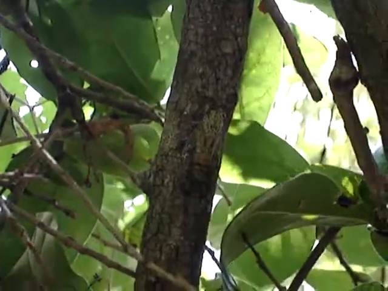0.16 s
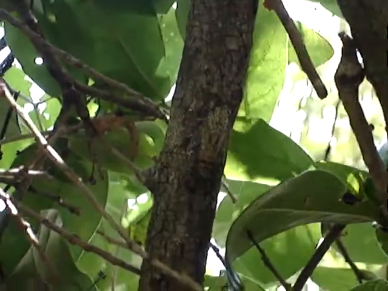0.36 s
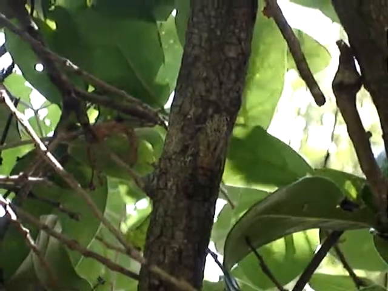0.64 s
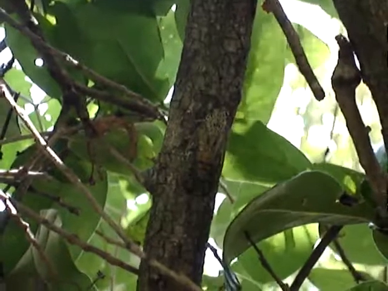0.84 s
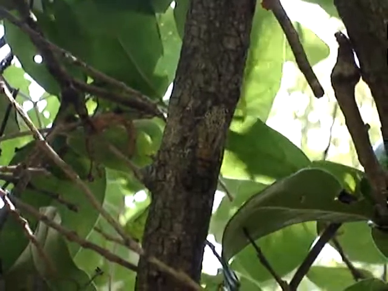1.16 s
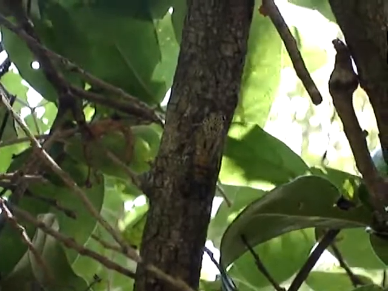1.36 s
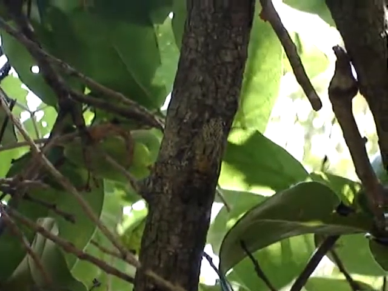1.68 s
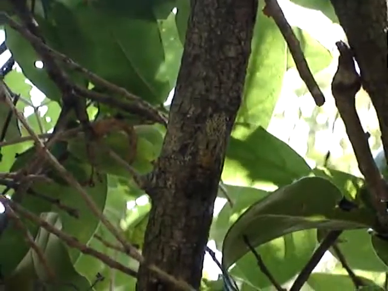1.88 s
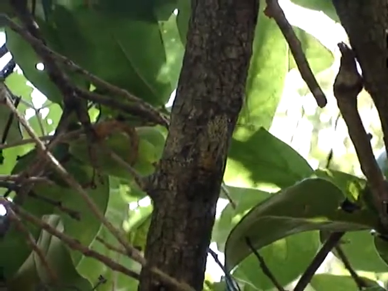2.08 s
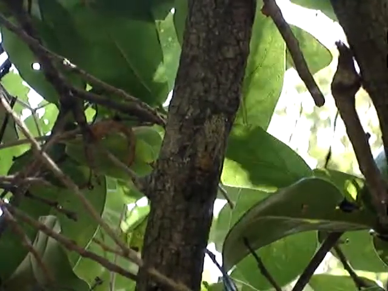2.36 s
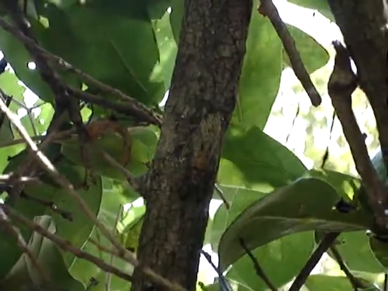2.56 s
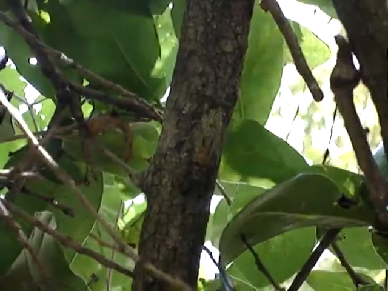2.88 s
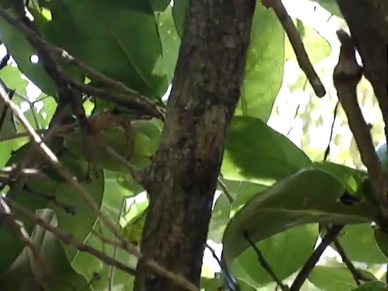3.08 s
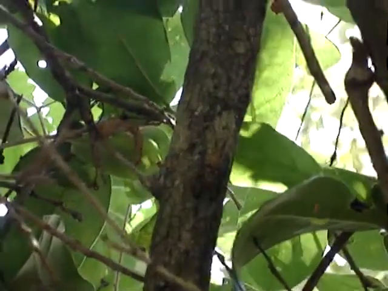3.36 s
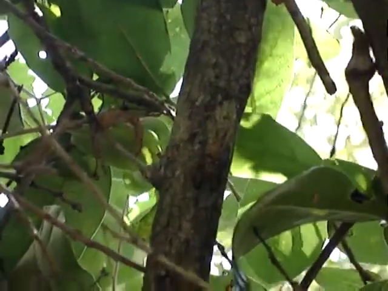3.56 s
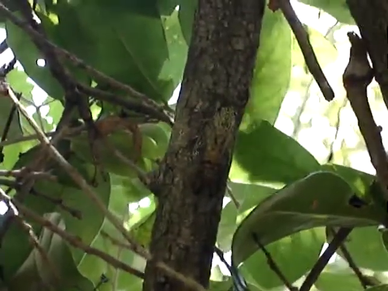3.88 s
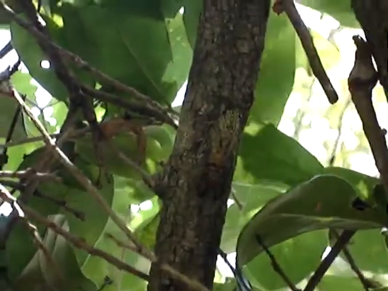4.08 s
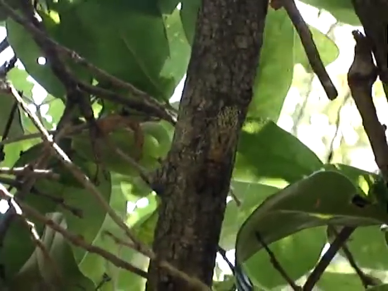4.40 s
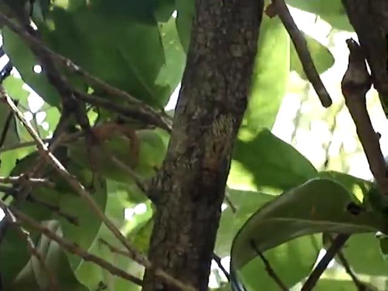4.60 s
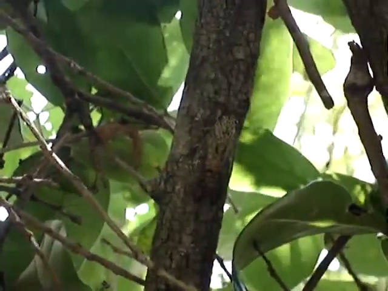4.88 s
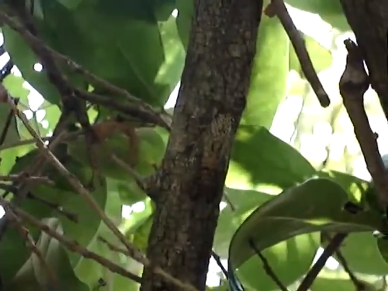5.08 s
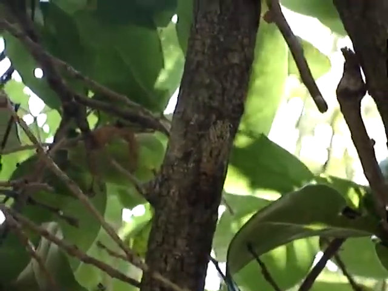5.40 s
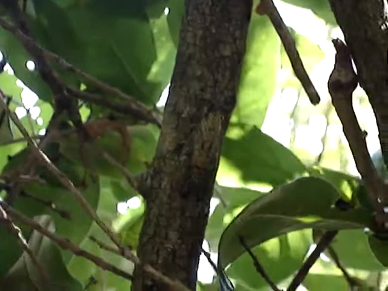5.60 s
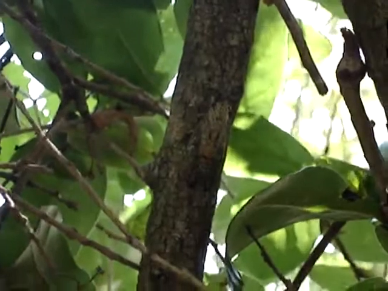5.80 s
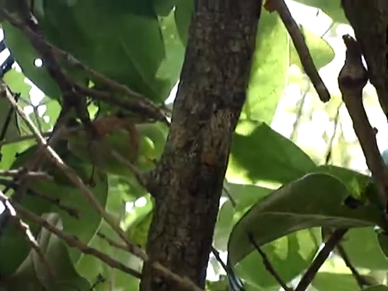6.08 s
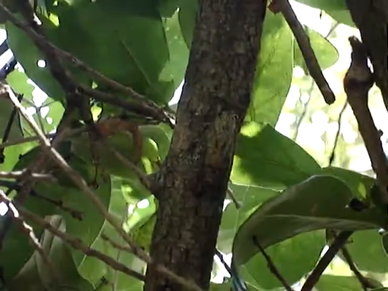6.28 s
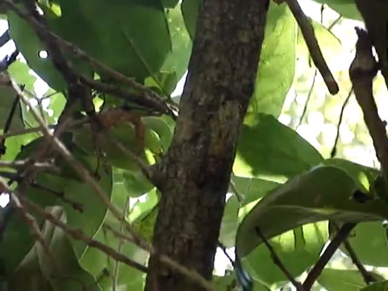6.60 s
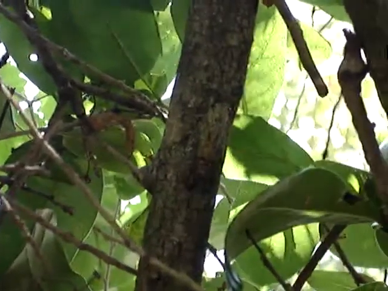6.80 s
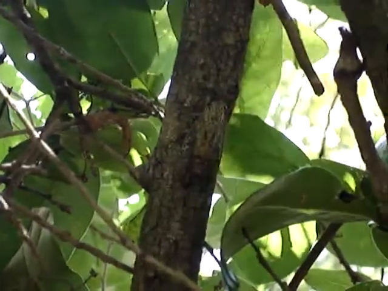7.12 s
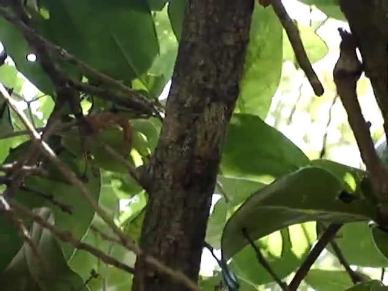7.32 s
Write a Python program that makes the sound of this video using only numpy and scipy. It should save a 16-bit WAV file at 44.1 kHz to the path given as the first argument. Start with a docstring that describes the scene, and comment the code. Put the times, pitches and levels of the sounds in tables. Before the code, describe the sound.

Harsh high insect buzzing surges and cuts off about twice a second, stutters, rests, and returns in a quick flurry above distant road noise.

```python
"""A cicada sings close by: its buzz runs up into shrill peaks, breaks off and restarts, stutters in bouts midway,
then rests for over a second before a last flurry. A fainter cicada rasp swells and fades behind the main buzz,
and a vehicle passes far away with a sinking drone over tyre roar, low thuds and faint air.
Buzz and rasp are trains of tymbal clicks ringing through body resonances; the road is shaped noise and two sines.
One microphone feeds both channels; its gain control ducks whatever passes a threshold."""
import sys
import numpy as np
from scipy import signal
from scipy.io import wavfile
from scipy.ndimage import uniform_filter1d

SR = 44100
rng = np.random.default_rng(int(sys.argv[2]) if len(sys.argv) > 2 else 0)


def transcribe(u):
    """Save the signal u as a 16-bit wav file named by the first command-line argument.

    u: samples, shape (n,) or (channels, n), limited to [-1, 1]; the rate is SR.
    q: integer samples, one column per channel.
    """
    v = np.clip(np.atleast_2d(u).T, -1, 1)
    q = np.round(v * 32767).astype(np.int16)
    wavfile.write(sys.argv[1], SR, q)


N = 328545
TIME = np.arange(N) / SR  # seconds

# Idling buzz of the near cicada between peaks.
# Each row: time in seconds, rate in clicks per second, abdomen level in dB.
IDLE_BUZZ = [(0, 195, -28), (1.6, 188, -26), (3.4, 184, -24.5), (4.57, 172, -22.5), (4.64, 140, -21.5),
             (5.1, 114, -21.5), (5.25, 135, -22), (6.56, 235, -19.5), (7.45, 245, -22.5)]
# Shrill peaks of the near cicada. Each row: time of full effort in seconds, hold in seconds, run-up in seconds,
# top rate in clicks per second before the arch, abdomen level in dB, whether it breaks off afterwards.
SHRILL_PEAKS = [(.288, .125, 0.087, 336, -17, True), (.802, .123, .085, 338, -18, True),
                (1.295, .140, .085, 336, -17, True), (1.797, .122, .06, 339, -15, True),
                (2.305, .128, 0.083, 339, -15, True), (3.015, .126, 0.091, 341, -16, True),
                (3.700, .133, 0.097, 341, -14, True), (6.635, .080, .08, 353, -11.5, False),
                (6.841, .022, 0.0071, 338, -14.5, False), (6.967, .030, 0.0076, 328, -16.5, False),
                (7.105, .115, 0.065, 338, -14.5, False), (7.337, .028, 0.01, 332, -18, False)]
# Stalls of the near cicada. Each row: start in seconds, end in seconds.
SONG_STALLS = [(1.73, 1.741), (2.905, 2.92), (3.545, 3.575), (4.456, 4.475), (4.526, 4.574), (5.175, 5.201),
               (5.248, 6.56), (6.824, 6.84), (6.957, 6.968), (7.326, 7.339)]
# Bouts of stutter in its click rate. Each row: start in seconds, length in seconds, depth as a share of the rate.
STUTTER_BOUTS = [(2.699, .08, 0.13), (3.353, 0.065, .13), (4.16, .36, .2), (5.101, .15, .11)]
# Resonances of its abdomen, slack and stretched taut.
# Each row: pitch in Hz, width in Hz, level in dB relative to the other rows.
SLACK_ABDOMEN_MODES = [(4214, 1260, 6.5), (5700, 470, -9.5), (7240, 1300, -1), (8060, 1280, 0)]
TAUT_ABDOMEN_MODES = [(4160, 820, -3.5), (5430, 1380, -3), (6510, 670, -4.5), (8470, 480, -4)]
# Resonances of its tymbals, slack and taut.
# Each row: pitch in Hz, width in Hz, level in dB relative to the other rows.
SLACK_TYMBAL_MODES = [(9330, 235, -6.5), (9920, 180, -10.5)]
TAUT_TYMBAL_MODES = [(9225, 120, -0.67), (9847, 155, -2)]
# Hard snaps as the tymbals start again. Each row: time in seconds, strength in dB before a 13.5 dB boost.
RESTART_SNAPS = [(6.84, -10), (6.971, -10), (7.339, -15)]
# Murmur of the faint rasp. Each row: time in seconds, level in dB before the dips.
MURMUR_CURVE = [(0, -30), (2.5, -29), (4.5, -28.5), (5.6, -25), (6.25, -28), (7.45, -28.5)]
# Swells of the faint rasp. Each row: centre in seconds, top level in dB before the dips, half-length in seconds.
RASP_SWELLS = [(0.616, -27, 0.0591), (1.13, -24.5, .05), (1.721, -26, 0.0609), (2.219, -23, .06),
               (2.851, -21, .07), (3.501, -21.5, .07), (4.091, -23, .08), (4.751, -21, .07),
               (5.425, -16, .065), (6.059, -21, .05), (6.436, -13.5, 0.1)]
# Resonances of the faint rasp, murmuring and at full swell.
# Each row: pitch in Hz, width in Hz, level in dB relative to the other rows.
MURMUR_MODES = [(4090, 820, 2), (5140, 890, 2), (7680, 1200, -4), (9050, 780, 3.5), (9940, 230, -0.5)]
SWELL_MODES = [(4690, 590, -0.5), (5770, 900, -14.5), (8700, 650, -19.5), (8930, 820, -1.5),
               (9960, 310, -7.5)]
# Tyre roar of distant traffic. Each row: time in seconds, level in dB.
ROAR_CURVE = [(0, -36), (.5, -37), (1.6, -30.5), (2.9, -29.5), (3.45, -31.5), (4, -32), (5, -35),
              (6.1, -31), (6.55, -31), (6.7, -34.5), (7.45, -42)]
# Low rumble of the road. Each row: time in seconds, level in dB.
RUMBLE_CURVE = [(0, -51), (2.5, -48), (6.4, -45), (7.45, -47.5)]
# Dull low thuds, heard within the rumble. Each row: centre in seconds, top level in dB.
LOW_THUDS = [(.72, -46), (2.84, -40.5), (3.0, -37), (3.6, -38), (5.65, -36), (5.759, -34), (5.951, -40.5),
             (6.3, -38), (6.43, -38), (6.56, -38.5)]
# Drone of the passing vehicle. Each row: time in seconds, fundamental in dB, octave in dB.
DRONE_CURVE = [(0, -52, -57), (.5, -49.5, -44), (1.25, -37.5, -50), (1.6, -47, -41.5), (2.9, -42, -38.5),
               (3.3, -56, -41), (5.3, -51, -46), (6.5, -45, -42.5), (6.9, -57, -56)]
# Spectra of the roar, the rumble and the still air at the microphone.
# Each row: frequency in Hz, relative density in dB per Hz.
ROAR_SPECTRUM = [(150, -22.5), (300, -8), (450, -3), (650, -2.5), (950, 1.5), (1300, -5.5), (2000, -14),
                 (2800, -22.5), (5000, -10.5)]
RUMBLE_SPECTRUM = [(20, -13.5), (45, -13), (65, -6), (115, -3), (200, -5.5), (320, -10), (600, -41)]
AIR_SPECTRUM = [(20, 3), (40, -13), (70, -12), (200, -28)]

# timing of the near song
RELAX_S = 0.046  # the click rate falls back to idling
LOUD_RISE_SHARE, LOUD_FALL_S = 0.31, 0.062  # loudness comes late in the run-up and lingers
SHRILL_IDLE_DB, SHRILL_PEAK_DB = -8.5, 4.5  # tymbal ring relative to the abdomen
SHRILL_LAG_SHARE, SHRILL_RISE_S, SHRILL_FALL_S = 0.32, 0.027, 0.026  # the ring blooms a share of the run-up late
ARCH_OUTSIDE, ARCH_MIDDLE = 0.98, 0.99  # shares of the top rate: it sags from mid-peak towards both ends
PAUSE_S = 0.031  # silence after a peak that breaks off
STUTTER_HZ, STUTTER_FADE_S = 16.33, 0.0507

# body of the near cicada, slack and taut
SLACK_RATE, TAUT_RATE = 245, 335  # clicks per second between which the body tightens
STRETCH_S = 0.02  # the abdomen follows the effort late
SLACK_RIB_HZ, TAUT_RIB_HZ = 4227, 4906  # pace at which the ribs buckle
SLACK_RIB_FALL_DB, TAUT_RIB_FALL_DB = -2.5, -4.5  # per rib: a slack abdomen rings longer
SLACK_JITTER_S, TAUT_JITTER_S = 0.000045, 0.000004  # a slack tymbal keeps time badly
SLACK_RASP_DB, TAUT_RASP_DB = -6, -10
UNEVEN_DB = 2.0  # scatter in the strength of the clicks

# faint rasp
MURMUR_RASP_DB, SWELL_RASP_DB = 9, -7
DIP_DB, DIP_S = 16.5, 0.06  # the faint rasp dips around the end of each peak

# road: pitch at the closest approach, Doppler shift, its moment, and the time scale of the passing
DRONE_HZ, DOPPLER_SHARE, CLOSEST_S, PASSING_S = 233.6, 0.097, 2.75, 2.0
THUD_S = 0.046  # half-length

CUTOFF_HZ = 10060  # top of the microphone's range


def from_db(db):
    """Decibels to gain."""
    return 10 ** (np.asarray(db) / 20)


def between(low, high, share):
    """Blend from one value to another."""
    return low + (high - low) * share


def rms_one(x):
    """Scale to unit power."""
    return x / np.sqrt(np.mean(x ** 2) + 1e-20)


def in_time(rows):
    """Each column of a curve, sample by sample."""
    seconds, *columns = np.transpose(rows)
    return [np.interp(TIME, seconds, column) for column in columns]


def held(start, length, rise_s, fall_s):
    """An envelope that grows exponentially to 1, holds and dies away."""
    before = np.minimum(TIME - start, 0)
    after = np.maximum(TIME - start - length, 0)
    return np.exp(before / rise_s - after / fall_s)


def bell(centre, half_length_s):
    """A smooth hump of height 1."""
    return np.exp(-np.minimum(((TIME - centre) / half_length_s) ** 2, 50))


def lifted(base, events):
    """A resting value, drawn towards each event's top by its envelope; the strongest event wins."""
    return base + np.max([(top - base) * envelope for top, envelope in events], axis=0)


def drift(rate_hz):
    """Slow chance with spread 1: smoothed noise, drawn once every 40 samples."""
    step = 40
    r = np.exp(-2 * step * np.pi * rate_hz / SR)
    noise = rng.standard_normal(N // step + 2002)
    slow = signal.lfilter([1], [1, -2 * r, r * r], noise)[2000:]  # skip the filter's settling
    return np.interp(np.arange(N) / step, np.arange(len(slow)), rms_one(slow))


def evened(x, size=700):
    """Hold the power steady from one group of clicks to the next."""
    power = uniform_filter1d(uniform_filter1d(x ** 2, size), size)
    return x / np.sqrt(np.maximum(power, 1e-12))


def resonator_poles(hz, width_hz):
    """Feedback coefficients of one damped resonance; also returns the pole radius."""
    r = np.exp(-np.pi * width_hz / SR)
    return [1, -2 * r * np.cos(2 * np.pi * hz / SR), r * r], r


def resonate(x, modes):
    """Parallel resonances with alternating signs."""
    out = 0
    for k, (hz, width_hz, db) in enumerate(modes):
        poles, r = resonator_poles(hz, width_hz)
        zeros = np.array([1, 0, -1]) * (1 - r * r) / 2
        out = out + (-1) ** k * from_db(db) * signal.lfilter(zeros, poles, x)
    return out


def radiate(x, edge_hz):
    """A body this small radiates almost nothing below its main resonance."""
    return signal.sosfilt(signal.butter(5, edge_hz, "high", fs=SR, output="sos"), x)


def disperse(x, hz, width_hz):
    """A resonant passage holds back the sound near its pitch, which rounds each pulse (all-pass)."""
    poles, _ = resonator_poles(hz, width_hz)
    return signal.lfilter(poles[::-1], poles, x)


def tymbal_clicks(rate, rib_hz, jitter_s, rib_jitter_s, rib_fall_db, uneven_db, sway_s, count=9):
    """Each muscle pull buckles a row of ribs, one for every swing of the abdomen."""
    turns = np.cumsum(rate) / SR
    pulls = np.interp(np.arange(1, turns[-1]), turns, TIME)[:, None]
    ribs = np.arange(count)
    early_late, strength = rng.standard_normal((2, len(pulls), count))
    start = pulls + np.interp(pulls, TIME, jitter_s) * early_late[:, :1]
    # left and right tymbal take turns, not quite evenly
    start = start + sway_s * (-1) ** np.arange(len(pulls))[:, None]
    rib_delay = ribs / np.interp(pulls, TIME, rib_hz)
    at = SR * (start + rib_delay + rib_jitter_s * early_late * (ribs > 0))
    fall_db = ribs * np.interp(pulls, TIME, rib_fall_db)
    size = from_db(fall_db + np.interp(pulls, TIME, uneven_db) * strength)
    # clicks fall between samples, so each is spread as a short sinc
    taps = np.floor(at)[..., None] + np.arange(-3, 5)
    offset = taps - at[..., None]
    shape = size[..., None] * np.sinc(offset) * np.sinc(offset / 4)
    places = np.clip(taps, 0, N - 1).astype(int)
    return np.bincount(places.ravel(), shape.ravel(), N) + 1e-18


def foliage(clicks, wet_db, decay_s):
    """Leaves scatter every click into a short rasping tail."""
    r = np.exp(-1 / (decay_s * SR))
    power = signal.lfilter([1 - r], [1, -r], clicks ** 2)
    return clicks + from_db(wet_db) * np.sqrt(power) * rng.standard_normal(N)


def coloured_noise(spectrum, flicker_db):
    """Half-octave bands of noise, each flickering a little on its own, at unit power overall."""
    hz, db = np.transpose(spectrum)
    edges = 18 * 2 ** np.arange(0, 8.6, .5)
    white = rng.standard_normal((2, N))  # neighbouring bands draw on different noise
    out = 0
    for k, (low, high) in enumerate(zip(edges, edges[1:])):
        band_filter = signal.butter(2, [low, high], "band", fs=SR, output="sos")
        band = signal.sosfilt(band_filter, white[k % 2])
        level_db = np.interp(np.log(low * high) / 2, np.log(hz), db, left=db[0], right=-90)
        out = out + band * from_db(level_db + flicker_db * drift(8.2))
    return rms_one(out)


def song():
    """Click rate, abdomen level and shrill ring: each peak runs up from the idling buzz, holds and relaxes."""
    idle_rate, idle_db = in_time(IDLE_BUZZ)
    faster, louder, shriller = [], [], []
    for s, hold_s, run_up_s, top_rate, top_db, _ in SHRILL_PEAKS:
        lag_s = SHRILL_LAG_SHARE * run_up_s
        arch = between(ARCH_OUTSIDE, ARCH_MIDDLE, bell(s + hold_s / 2, hold_s / 2))
        faster.append((top_rate * arch, held(s, hold_s, run_up_s, RELAX_S)))
        louder.append((top_db, held(s, hold_s, LOUD_RISE_SHARE * run_up_s, LOUD_FALL_S)))
        bloom = held(s + lag_s, hold_s - lag_s, SHRILL_RISE_S, SHRILL_FALL_S)
        shriller.append((SHRILL_PEAK_DB, bloom))
    return lifted(idle_rate, faster), lifted(idle_db, louder), lifted(SHRILL_IDLE_DB, shriller)


def singing():
    """1 while the tymbals work, 0 in the pauses after peaks and in stalls."""
    pauses = [(s + hold_s, s + hold_s + PAUSE_S) for s, hold_s, *_, breaks_off in SHRILL_PEAKS if breaks_off]
    gate = np.ones(N)
    for start, end in pauses + SONG_STALLS:
        gate[int(start * SR):int(end * SR)] = 0
        # after a longer rest the muscle takes a few pulls to reach full force
        recovery_s = np.clip(end - start - .016, .001, .018)
        gate *= np.where(TIME < end, 1, np.interp(TIME - end, [0, recovery_s], [.45, 1]))
    return uniform_filter1d(gate, size=70)


def near_cicada():
    """The faster the clicks, the tauter the body: its ring glides up and the buzz turns pure and shrill."""
    rate, level_db, shrill_db = song()
    taut = np.clip((rate - SLACK_RATE) / (TAUT_RATE - SLACK_RATE), 0, 1)
    depth = sum(share * held(s, length_s, STUTTER_FADE_S, STUTTER_FADE_S)
                for s, length_s, share in STUTTER_BOUTS)
    stutter = depth * np.cos(2 * np.pi * STUTTER_HZ * TIME)
    rate = rate * (1 + stutter + .003 * drift(12))
    lagging = signal.lfilter([1], [1, -np.exp(-1 / (STRETCH_S * SR))], taut) / (STRETCH_S * SR)
    stretch = lagging ** 2
    firm = np.sqrt(taut)  # the clicks turn clean early in the run-up
    clicks = tymbal_clicks(rate, between(SLACK_RIB_HZ, TAUT_RIB_HZ, stretch),
                           between(SLACK_JITTER_S, TAUT_JITTER_S, firm), rib_jitter_s=.000006,
                           rib_fall_db=between(SLACK_RIB_FALL_DB, TAUT_RIB_FALL_DB, stretch ** 2),
                           uneven_db=np.full(N, UNEVEN_DB), sway_s=.000012)
    clicks = foliage(clicks, between(SLACK_RASP_DB, TAUT_RASP_DB, firm), decay_s=.002)
    abdomen = between(resonate(clicks, SLACK_ABDOMEN_MODES), resonate(clicks, TAUT_ABDOMEN_MODES), stretch)
    abdomen = disperse(radiate(abdomen, edge_hz=4390), hz=4405, width_hz=505)
    tymbal = between(resonate(clicks, SLACK_TYMBAL_MODES), resonate(clicks, TAUT_TYMBAL_MODES), taut)
    tymbal = disperse(radiate(tymbal, edge_hz=8450), hz=9450, width_hz=650)
    voice = evened(abdomen) + from_db(shrill_db) * evened(tymbal)
    return singing() * from_db(level_db) * voice


def faint_rasp():
    """A fainter train of tymbal clicks behind the main buzz, scattered into a rasp that clears as it swells."""
    murmur_db, = in_time(MURMUR_CURVE)
    swells = [(db, bell(s, half_s)) for s, db, half_s in RASP_SWELLS]
    dips = np.max([held(s + hold_s, PAUSE_S, DIP_S, DIP_S) for s, hold_s, *_ in SHRILL_PEAKS], axis=0)
    level_db = lifted(murmur_db, swells) - DIP_DB * dips
    taut = .5 + .5 * np.tanh((level_db + 20.5) / 5)  # the louder, the tauter
    slack = 1 - taut
    rate = 325 + 46 * taut + (1 + 16 * slack) * drift(8)
    clicks = tymbal_clicks(rate, rib_hz=4480 + 220 * taut, jitter_s=.000008 + .00012 * slack,
                           rib_jitter_s=.00002, rib_fall_db=-7.0 + 2 * taut,
                           uneven_db=3.0 - taut, sway_s=.00001)
    clicks = foliage(clicks, between(MURMUR_RASP_DB, SWELL_RASP_DB, taut), decay_s=.0014)
    voice = resonate(clicks * slack, MURMUR_MODES) + resonate(clicks * taut, SWELL_MODES)
    voice = disperse(radiate(voice, edge_hz=3950), hz=8910, width_hz=500)
    return from_db(level_db) * evened(voice)


def vehicle_drone():
    """A fundamental and its octave, sinking by the Doppler shift around the closest approach."""
    fundamental_db, octave_db = in_time(DRONE_CURVE)
    receding = (TIME - CLOSEST_S) / np.hypot(TIME - CLOSEST_S, PASSING_S)
    pitch_hz = DRONE_HZ * (1 - DOPPLER_SHARE * receding)
    phase = 2 * np.pi * np.cumsum(pitch_hz * (1 + .01313 * drift(14.9))) / SR
    fundamental = from_db(fundamental_db + 2.6 * drift(3.4)) * np.sin(phase)
    octave = from_db(octave_db + 3.6 * drift(11)) * np.sin(2 * phase)
    return fundamental + octave


def traffic_and_thuds():
    """Tyre roar and rumble with low thuds as shaped noise, with the drone of a passing vehicle."""
    roar_db, = in_time(ROAR_CURVE)
    base_db, = in_time(RUMBLE_CURVE)
    rumble_db = lifted(base_db, [(db, bell(s, THUD_S)) for s, db in LOW_THUDS])
    drone = vehicle_drone()
    roar = from_db(roar_db) * coloured_noise(ROAR_SPECTRUM, flicker_db=1.35)
    rumble = from_db(rumble_db) * coloured_noise(RUMBLE_SPECTRUM, flicker_db=3.0)
    return roar + rumble + drone


def still_air():
    """A faint bed of low noise at the microphone."""
    return from_db(-60) * coloured_noise(AIR_SPECTRUM, flicker_db=1.2)


def snaps():
    """The first buckling after a short stop is hard and broad in pitch: one impulse into a slack abdomen."""
    clicks = np.zeros(N)
    for s, db in RESTART_SNAPS:
        clicks[int(s * SR)] = from_db(db + 13.5)
    return resonate(clicks + 1e-18, SLACK_ABDOMEN_MODES)


def scene():
    """Buzz, faint rasp, road, thuds and air, the same in both channels."""
    air = still_air()
    mix = near_cicada() + snaps() + faint_rasp() + traffic_and_thuds() + air
    return np.tile(mix, (2, 1))


def gain_control(x, threshold_db, attack_per_s, release_s, size=220):
    """The gain is pulled down while the output is over the threshold, and creeps back afterwards."""
    starts = np.arange(0, N, size)
    levels = 10 * np.log10(np.add.reduceat(x[0] ** 2, starts) / size + 1e-12)
    cuts = [0]  # dB of reduction, block by block
    for level in levels[:-1]:
        excess = max(0, level - cuts[-1] - threshold_db)
        change_per_s = attack_per_s * excess - cuts[-1] / release_s
        cuts.append(cuts[-1] + size / SR * change_per_s)
    return x * from_db(-np.interp(np.arange(N), starts + size / 2, cuts))


def record(dry):
    """Gain control, then a steep cut of the top."""
    levelled = gain_control(dry, threshold_db=-16.5, attack_per_s=47.0, release_s=0.098)
    top_cut = signal.ellip(12, .3, 85, CUTOFF_HZ, fs=SR, output="sos")
    return signal.sosfilt(top_cut, levelled)


dry = scene()
out = record(dry)
transcribe(out)
```